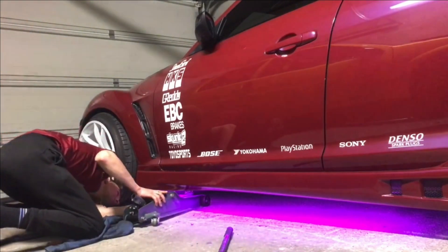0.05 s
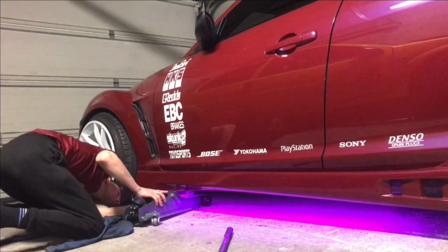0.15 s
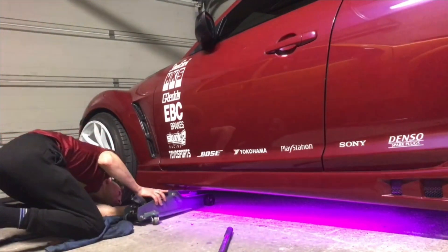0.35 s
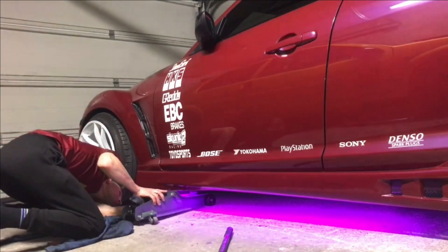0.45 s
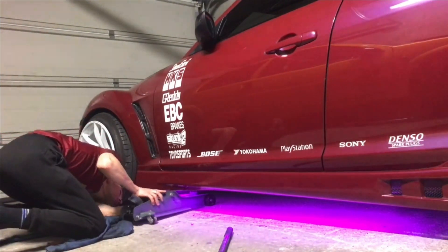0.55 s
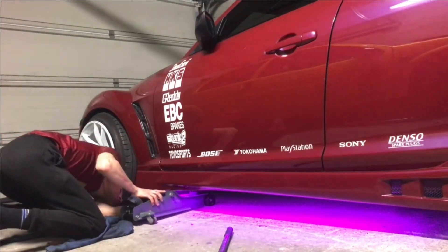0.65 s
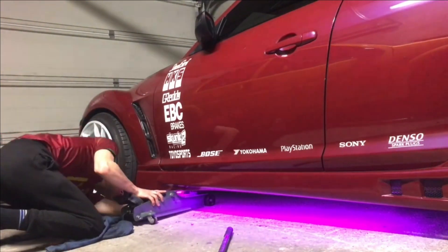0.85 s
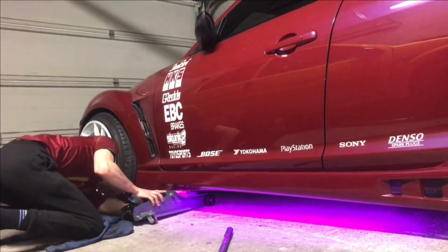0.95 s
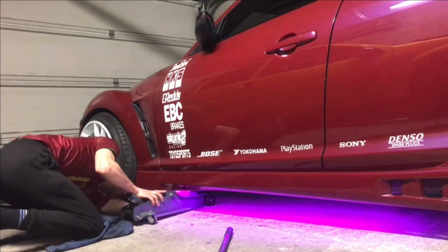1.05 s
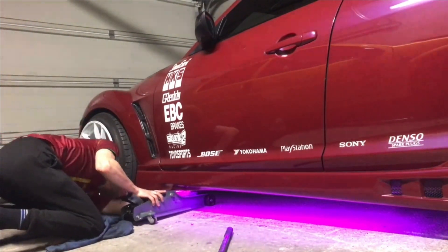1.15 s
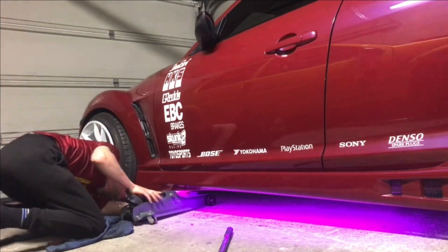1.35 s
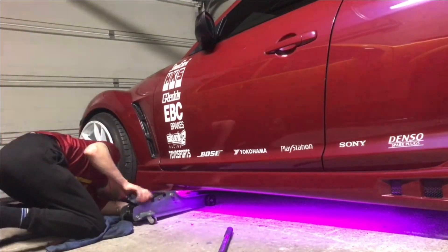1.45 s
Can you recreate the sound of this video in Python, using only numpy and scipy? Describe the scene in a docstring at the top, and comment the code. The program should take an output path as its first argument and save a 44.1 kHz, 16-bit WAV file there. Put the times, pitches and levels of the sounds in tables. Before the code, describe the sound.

A steel trolley jack clatters as it is shifted under a car. From about 0.2 to 0.5 seconds comes a quick run of ringing clacks and hollow knocks, with a low boom from the floor. Softer taps follow until 0.8 seconds. A few bright clinks sound between 1.0 and 1.3 seconds, then light knocks around 1.4. The garage echoes briefly over a faint, steady background.

```python
"""A steel trolley jack is shifted under a car in a quiet garage. Its frame clatters as it moves and settles,
the lifting arm knocks hollowly, and near the end the loose saddle clinks a few times. Each contact is a short
crack that sets the steel ringing. The car body booms deeply now and then, and the room echoes over a faint,
steady background."""
import sys
import numpy as np
from scipy import signal
from scipy.fft import rfft, irfft, next_fast_len
from scipy.io import wavfile

SR = 44100
rng = np.random.default_rng(int(sys.argv[2]) if len(sys.argv) > 2 else 0)


def file_out(sig):
    """Save sig as 16-bit WAV at sys.argv[1]."""
    # one column per channel
    cols = np.atleast_2d(sig).T
    # limit, then scale
    lim = np.clip(cols, -1, 1)
    pcm = np.round(lim * 32767).astype(np.int16)
    wavfile.write(sys.argv[1], SR, pcm)


N = 66150
T = np.arange(N) / SR


def gain(db):
    """Turn decibels into a number to multiply by."""
    return 10 ** (np.asarray(db) / 20)


def fade(fade_s):
    """Die away by 60 dB in fade_s seconds; every fade time below means this."""
    return np.exp(-np.log(1000) * T / fade_s)


def onset(rise_s):
    """Rise from silence to full level."""
    return np.minimum(T / rise_s, 1)


def read_curve(hz, points):
    """Read between (f/Hz, value) points, giving every octave the same width."""
    point_hz, values = np.array(points, float).T
    return np.interp(np.log(np.maximum(hz, 1)), np.log(point_hz), values)


def colour(x, tone, notes=(), peak_db=0, peak_width_hz=68):
    """Shape a sound with a (f/Hz, level/dB) curve and add a ringing peak around each note."""
    size = next_fast_len(N) * 2
    hz = np.arange(size // 2 + 1) * SR / size
    peaks = 1 + sum(gain(db + peak_db) ** 2 / (1 + (2 * (hz - centre) / peak_width_hz) ** 2)
                    for centre, db, _ in notes)
    response = gain(read_curve(hz, tone)) * np.sqrt(peaks)
    # Fold the filter forward in time, so nothing rings before it is hit.
    cepstrum = irfft(np.log(response))
    cepstrum[1:size // 2] *= 2
    cepstrum[size // 2 + 1:] = 0
    return irfft(rfft(x, size) * np.exp(rfft(cepstrum)))[..., :N]


def noise(tone):
    """Noise shaped by a tone curve, then scaled to a typical size (rms) of 1."""
    x = colour(rng.standard_normal(N), tone)
    return x / np.std(x)


def start_at(x, start_s):
    """Move a sound to its start time; one begun before zero is already fading."""
    return np.interp(np.arange(N) - np.round(start_s * SR), np.arange(N), x, left=0, right=0)


# How long the garage echoes at each pitch: f/Hz, fade/s
ECHO_FADES = [(200, 0.9), (800, 0.55), (1800, 0.4), (3500, 0.3), (7000, 0.4), (14000, 0.19)]

def garage_echo(level_db=-11, build_s=0.024):
    """Many reflections blur into one wash of sound; the highs die first."""
    spectrum = rfft(rng.standard_normal(N))
    hz = np.arange(len(spectrum)) * SR / N
    echo = np.zeros(N)
    for band_hz, fade_s in ECHO_FADES:
        share = read_curve(hz, [(f, f == band_hz) for f, _ in ECHO_FADES])
        echo += irfft(spectrum * share, N) * fade(fade_s)
    return gain(level_db) * echo * onset(build_s)


# The five pitches, low to high, at which each hit has its own level: f/Hz
HIT_BANDS = [700, 1700, 3400, 7000, 13000]

def struck_steel(hits, notes, tone, snap_s, crack_s, wash_s, wash_db, notes_db, peak_db):
    """Each hit snaps, then rings the steel and the room; where and how hard it lands sets its tone."""
    waves = np.array([gain(db + notes_db) * fade(fade_s) * np.exp(2j * np.pi * hz * T)
                      for hz, db, fade_s in notes])
    # Fading noise makes the crack and the wash: a blur of notes too close to tell apart.
    envelope = np.hypot(fade(crack_s), gain(wash_db) * fade(wash_s))
    echo = garage_echo()
    snaps, rings = np.zeros(N), np.zeros(N)
    for start_s, rise_s, snap_db, *band_db in hits:
        phases = np.exp(2j * np.pi * rng.random(len(notes)))
        since_rise = T - rise_s  # the noise fades only once it has risen
        snap = gain(snap_db) * rng.standard_normal(N) * np.interp(since_rise, T, fade(snap_s))
        crack_and_wash = rng.standard_normal(N) * np.interp(since_rise, T, envelope)
        ring = crack_and_wash + (phases @ waves).imag + echo
        snap, ring = colour(np.array([snap, ring]) * onset(rise_s), list(zip(HIT_BANDS, band_db)))
        snaps += start_at(snap, start_s)
        rings += start_at(ring, start_s)
    return colour(snaps, tone) + colour(rings, tone, notes, peak_db)


# Hits on the frame: t/s, rise/s, snap level/dB, then level/dB at each of the HIT_BANDS
FRAME_HITS = [ (-.1000, 0.00083, -12, -31.5, -26.5, -34, -38, -22),
              (.2572, 0.00039, 10.5, -39, -32.5, -40.5, -42, -70),
              (.2655, 0.00033, 13, -29.5, -32, -40, -47.5, -56),
              (.3180, 0.0015, 3.5, -26.5, -20.5, -24.5, -30, -35),
              (.3710, .002, 2, -42.5, -35, -33, -38, -58),
              (.3840, 0.0019, 6, -32, -26.5, -14.5, -24.5, -27),
              (.4042, .0012, -2, -30.5, -33.5, -28, -29, -35),
              (.4152, 0.00095, 7.5, -28.5, -15, -27, -32, -31),
              (.4452, 0.003, 8, -34.5, -28.5, -22, -40, -40),
              (.4790, 0.0014, 11, -33.5, -28.5, -39.5, -42.5, -63),
              (.5060, .002, -18, -36, -37.5, -37.5, -70, -52),
              (.5260, 0.00056, -18, -41, -42, -51, -53.5, -82),
              (.6445, 0.0033, 1.5, -41, -39, -44.5, -57.5, -41),
              (.7050, 0.0041, 1.5, -56.5, -47, -54.5, -60, -78),
              (.8290, 0.0034, -10.5, -44, -51, -57, -59.5, -68), ]
# Notes the frame rings at: f/Hz, level/dB, fade/s
FRAME_NOTES = [(883, -7.5, 0.26), (1300, -7, 0.3), (1431, -5, 0.33), (1468, -7.5, 0.28), (1528, 3, 0.13),
               (1772, -4, 0.12), (1977, -25.5, 1.3), (1878, -6.5, 0.37), (1984, -9, 0.33),
               (2893, -19, 0.13), (3280, -12, 0.29), (3302, -4.5, 0.2), (5430, 1.5, 0.18),
               (5730, 0.5, 0.073)]
# The frame's tone curve: f/Hz, level/dB
FRAME_CURVE = [(30, -24), (120, 0), (300, -4), (900, -0.5), (1120, -5), (1550, 3), (2400, 3), (3700, 1.5),
               (4800, -1.5), (5900, 3), (7000, -6), (8700, 2), (10200, -9.5), (12500, -6.5), (16000, -28)]

def frame_clatter():
    """The steel frame clatters as it moves and settles."""
    return struck_steel(FRAME_HITS, FRAME_NOTES, FRAME_CURVE, snap_s=0.0013, crack_s=0.0321,
                        wash_s=0.1259, wash_db=-2.5, notes_db=-20.5, peak_db=-2)


# The background's tone curve: f/Hz, level/dB
AIR_CURVE = [(25, -33), (42, -1), (57, 0.5), (100, 0), (200, -11.5), (300, -6), (600, -17), (1000, -12.5),
             (1500, -14.5), (2500, -18), (5000, -23), (10000, -28.5), (16000, -26.5)]

def garage_air(level_db=-65):
    """The quiet garage has a faint, steady rumble and hiss."""
    return noise(AIR_CURVE) * gain(level_db)


# Knocks of the arm: t/s, rise/s, snap level/dB, then level/dB at each of the HIT_BANDS
ARM_HITS = [ (.2203, 0.00049, 6, -32.5, -30.5, -40, -49.5, -60),
            (.2798, 0.00077, 5.5, -29, -25.5, -31, -46, -52),
            (.7943, 0.00091, 11, -58, -48.5, -63, -70, -69),
            (.8460, 0.0049, -9, -53, -53.5, -66.5, -58, -73),
            (1.3450, 0.005, -4, -47, -40.5, -50, -65, -58.5),
            (1.3995, 0.0058, 0.5, -36.5, -35.5, -37.5, -53, -47.5),
            (1.4230, .001, -6, -39.5, -39, -42, -72, -76), ]
# Notes the arm rings at: f/Hz, level/dB, fade/s
ARM_NOTES = [(459, 2, 0.66), (534, 1, 0.44), (752, 0.5, 0.26), (1192, 1.5, 0.39), (1295, 6.5, 0.21),
             (1464, 1.5, 0.37), (1916, 2, 0.67), (2326, 6, 0.31), (2440, 1, 0.23), (2720, 10, 0.16),
             (3810, -1.5, 0.18)]
# The arm's tone curve: f/Hz, level/dB
ARM_CURVE = [(30, -28), (150, -4.5), (330, -13), (480, -4.5), (900, -2.5), (1300, -2), (2800, -2.5),
             (4100, -4), (7000, -3.5), (16000, -21)]

def arm_knocks():
    """The lifting arm knocks and rings with lower, hollow notes."""
    return struck_steel(ARM_HITS, ARM_NOTES, ARM_CURVE, snap_s=0.1247, crack_s=0.23,
                        wash_s=0.001, wash_db=-1.5, notes_db=-25, peak_db=-3)


# Thuds that set the car body booming: t/s, rise/s, level/dB
BODY_THUDS = [(0.226, 0.022, -49), (.28, .03, -50), (0.348, 0.023, -40), (0.479, 0.017, -47),
              (0.663, 0.0078, -54), (0.828, 0.0033, -58.5), (.94, 0.028, -64), (1.226, 0.014, -49.5)]
# The boom's tone curve: f/Hz, level/dB
BODY_CURVE = [(25, -13.5), (42, -31), (58, 7.5), (72, -8), (91, 4), (110, -9.5), (140, -13), (168, -2),
              (210, -16), (300, -12), (600, -22.5), (1500, -40.5)]

def body_boom(fade_s=0.55):
    """Each thud sets off deep ringing in the car body and the room."""
    power = sum(start_at((gain(db) * onset(rise_s) * fade(fade_s)) ** 2, start_s)
                for start_s, rise_s, db in BODY_THUDS)
    return noise(BODY_CURVE) * np.sqrt(power)


# Clinks of the saddle: t/s, rise/s, snap level/dB, then level/dB at each of the HIT_BANDS
SADDLE_HITS = [ (1.0430, 0.0013, 8.2, -40, -26, -22.5, -27.5, -39.5),
               (1.2053, 0.00042, 9.3, -49.5, -40, -50, -44.5, -38),
               (1.2237, 0.001, 5, -40.5, -33.5, -38.5, -32, -35.5),
               (1.3098, .0005, 3.1, -51.5, -45, -31.5, -45.5, -50), ]
# Notes the saddle rings at: f/Hz, level/dB, fade/s
SADDLE_NOTES = [(1204, -2.5, 0.5), (1650, -17, 0.33), (1876, -3.5, 0.39), (1925, -9, 0.34),
                (2765, 2.5, 0.13), (2828, 4, 0.073), (3850, -1, 0.23), (4130, -3, 0.12), (4195, 5.5, 0.08),
                (5580, -4, 0.33), (6458, 0.5, 0.15), (7260, 1, 0.17), (7300, -10, 0.15), (8700, -1, 0.09)]
# The saddle's tone curve: f/Hz, level/dB
SADDLE_CURVE = [(100, -29), (400, 2.5), (750, -0.5), (1200, -1), (2000, 1), (3300, -3.5), (4200, -3.5),
                (4900, -6.5), (6400, 2), (7700, -9.5), (9200, -0.5), (10800, -15.5), (13000, -6),
                (16000, -22)]

def saddle_clinks():
    """The saddle, the steel cup that holds the car, sits loose and clinks with high notes."""
    return struck_steel(SADDLE_HITS, SADDLE_NOTES, SADDLE_CURVE, snap_s=0.0124, crack_s=0.05,
                        wash_s=0.2954, wash_db=-7.5, notes_db=-23.5, peak_db=5)


def scene():
    """Add all the sounds together in one channel."""
    return (frame_clatter() + garage_air() + arm_knocks() + body_boom() + saddle_clinks())[None]


def record(dry):
    """Cut away the very highest sounds, above 15800 Hz."""
    return signal.sosfilt(signal.ellip(8, .2, 70, 15800, fs=SR, output="sos"), dry)


dry = scene()
out = record(dry)
file_out(out)
```